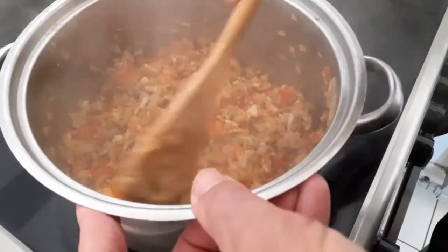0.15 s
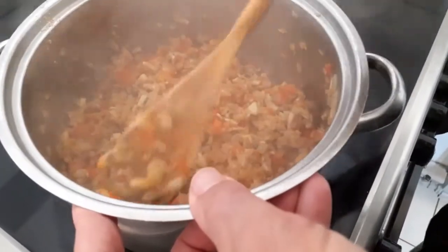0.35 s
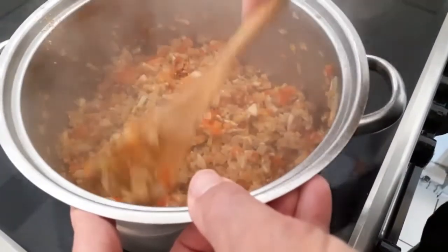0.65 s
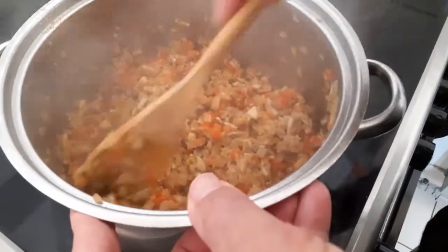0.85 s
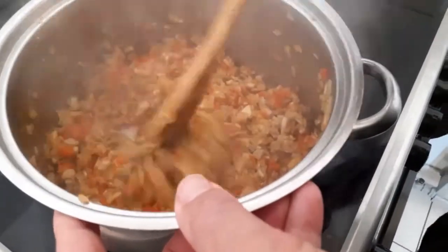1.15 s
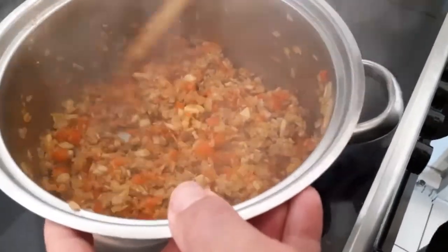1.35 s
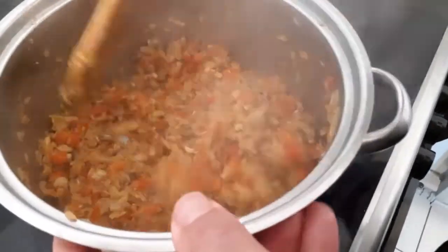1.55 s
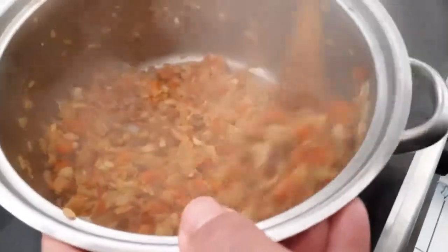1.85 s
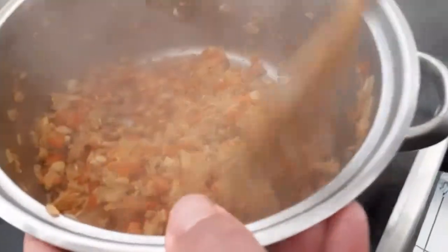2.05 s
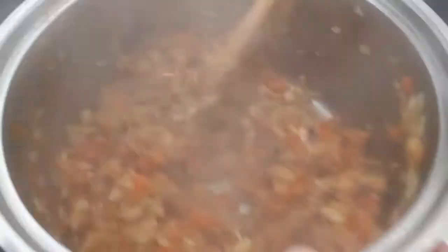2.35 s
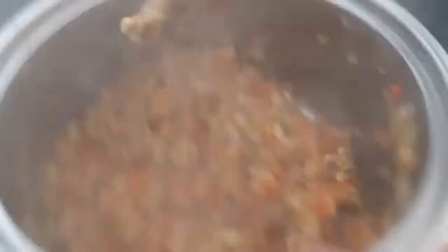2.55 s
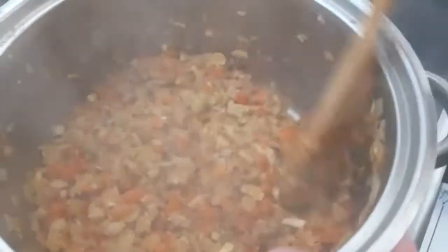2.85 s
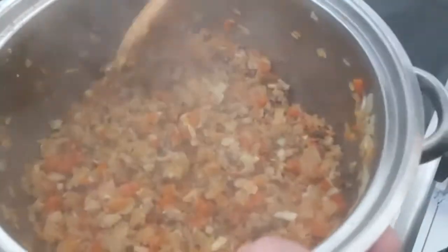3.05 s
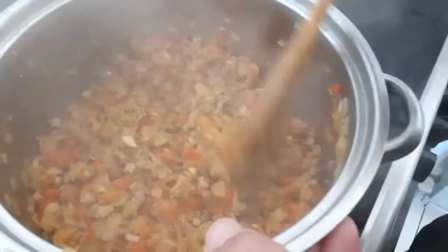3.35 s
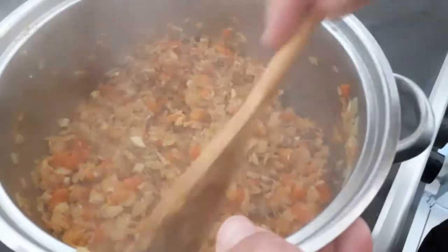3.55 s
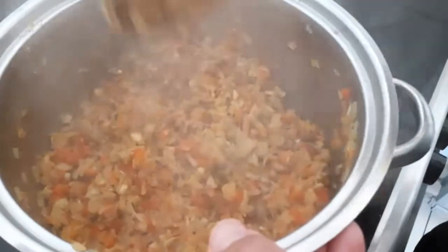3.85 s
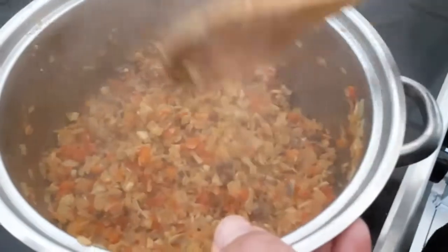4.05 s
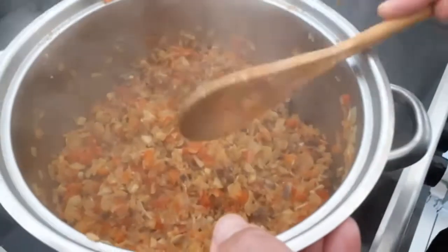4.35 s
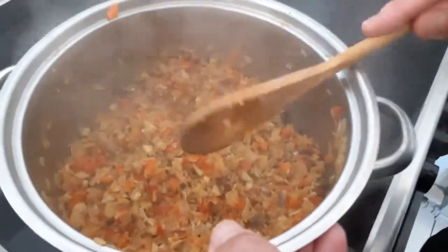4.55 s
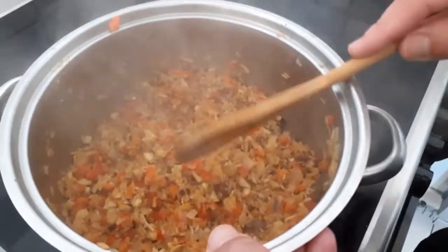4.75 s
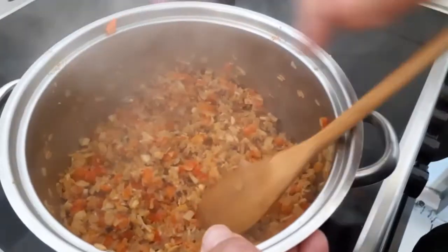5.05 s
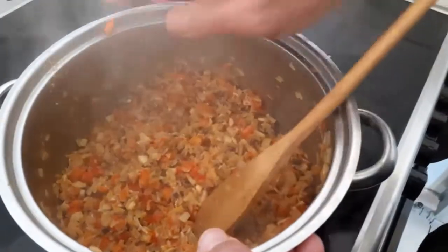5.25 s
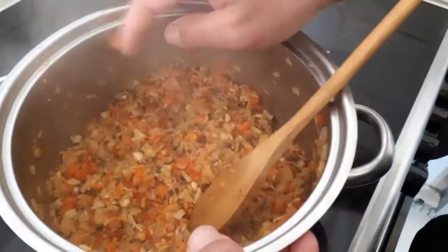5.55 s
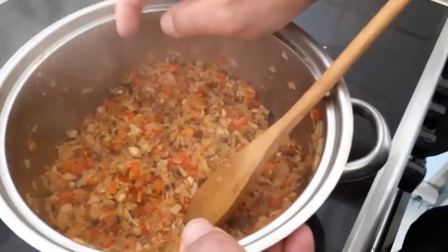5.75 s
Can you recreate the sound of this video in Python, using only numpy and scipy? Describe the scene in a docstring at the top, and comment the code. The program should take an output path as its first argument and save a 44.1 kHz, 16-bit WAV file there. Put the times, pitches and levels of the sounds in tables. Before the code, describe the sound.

Heard close up in a small kitchen, a wooden spoon works through wet frying food in a metal pot, with uneven dull knocks, rasping scrapes and short crackling spits. The sizzle swells as the food is turned, then settles when the stirring stops. Five quick, even taps of wood on the steel rim follow, and a few faint knocks end it. A low hum like a fan runs underneath.

```python
"""Frying food sizzles over a low hum; a wooden spoon knocks and scrapes in a steel pot on a hob.
Small kitchen, a phone's two microphone ports close to the pot. Wet food spits on the hot metal,
then the spoon is tapped clean five times on the rim.
Blows are sums of damped modes and short noise bursts; scraping, spitting and sizzling are trains of
tiny random clicks shaped by filters and envelopes; the hum is filtered noise."""
import sys
import numpy as np
from scipy import signal
from scipy.fft import rfft, irfft
from scipy.io import wavfile

SR = 44100
rng = np.random.default_rng(int(sys.argv[2]) if len(sys.argv) > 2 else 0)


def transcribe(signal):
    """Save signal, clipped to [-1, 1], as a 16-bit WAV file at the path in sys.argv[1]."""
    frames = np.atleast_2d(signal).T
    limited = np.clip(frames, -1, 1)
    pcm = np.round(limited * 32767).astype(np.int16)
    wavfile.write(sys.argv[1], SR, pcm)


N = 259308
TIME = np.arange(N) / SR
AFTER = TIME[:SR]  # the first second after a blow (s)

HEAVY_DB = -22  # thud level from which a blow shakes the hob fully


def amp(db):
    """Decibels to gain."""
    return 10 ** (np.asarray(db) / 20)


def at_hz(points, hz):
    """Read (Hz, value) points on a log-frequency axis."""
    f, value = np.transpose(points)
    return np.interp(np.log(hz + 1), np.log(f), value)


def colour(x, points):
    """Causal minimum-phase filter with the given spectrum; white noise keeps its power."""
    size = 4096
    gain = amp(at_hz(points, np.fft.rfftfreq(size, 1 / SR)))
    # folding the cepstrum onto positive times makes the response start at once
    cepstrum = irfft(np.log(gain))
    cepstrum[1:size // 2] *= 2
    cepstrum[size // 2 + 1:] = 0
    response = irfft(np.exp(rfft(cepstrum)))
    return signal.fftconvolve(x, response[None] / np.linalg.norm(response))[:, :x.shape[1]]


def soften(x, hz, order):
    """Low-pass: a soft contact cannot drive the high modes."""
    return signal.sosfilt(signal.butter(order, min(hz, SR / 3), fs=SR, output="sos"), x)


def spread(x, split_hz):
    """Two unrelated signals as heard by two ports: alike below split_hz, unrelated above."""
    side = signal.sosfilt(signal.butter(1, split_hz, "high", fs=SR, output="sos"), x[1])
    return np.array([x[0] + side, x[0] - side]) / np.sqrt(2)


def pan(x, left_db):
    """Make the left port louder than the right."""
    return x * amp(np.array([[1], [-1]]) * left_db / 2)


def unit(x):
    """Scale a blow to rms 1 over its first 25 ms."""
    return x / np.sqrt(np.mean(x[..., :SR // 40] ** 2))


def fade(t60):
    """Decay by 60 dB in t60 seconds."""
    return np.exp(-np.log(1000) * AFTER / t60)


def ring(modes, port_hz):
    """Damped modes of a randomly placed blow; those near port_hz and above reach the ports out of step."""
    scatter_db = 1.5  # how much the strength of a mode differs from spot to spot
    out = np.zeros((2, SR))
    for hz, db, t60 in modes:
        size, detune, place = rng.standard_normal(3)
        t = AFTER[AFTER < t60]
        phase = 2 * np.pi * hz * (1 + 0.0053 * detune) * t
        offset = np.array([[-1], [1]]) * (1 + 0.52 * place) * min(hz / port_hz, 1)
        gain = rng.choice([-1, 1]) * amp(db + scatter_db * size)
        decay = np.exp(-np.log(1000) * t / t60)
        out[:, :len(t)] += gain * decay * np.sin(phase + offset)
    return unit(out)


def burst(points, t60, split_hz):
    """Many crowded, short-lived modes, heard as fading coloured noise."""
    noise = spread(rng.standard_normal((2, SR)), split_hz)
    return colour(noise * fade(t60), points)


def grains(rate, scatter_db):
    """Two trains of tiny random clicks of uneven size, rate clicks per second on average, rms 1."""
    present = rng.random((2, N)) < rate / SR
    sign = rng.choice([-1, 1], (2, N))
    size = amp(scatter_db * np.minimum(rng.exponential(size=(2, N)), 5))
    x = present * sign * size
    return x / x.std()


def walk(rate):
    """Random wandering: straight lines between rate normal draws per second."""
    return np.interp(TIME * rate, np.arange(N), rng.standard_normal(N))


def add(out, s, x):
    """Mix a sound in at time s."""
    i = max(int(s * SR), 0)
    out[:, i:i + x.shape[1]] += x[:, :N - i]


def hum():
    """Low steady rush of the kitchen, like an extractor fan: noise weighted to the bass."""
    # spectrum of the rush: hz, density_db (dB per Hz, relative)
    hum_spectrum = [(20, -51), (45, -15), (72, 3.5), (102, 7), (135, -8), (220, -12), (310, -7.5),
                    (430, -19.5), (800, -25), (1300, -41.5), (4000, -52.5)]
    noise = spread(rng.standard_normal((2, N)), split_hz=770)
    return pan(colour(noise, hum_spectrum), left_db=6.0) * amp(-52.5)


def kitchen(x, wet_db):
    """Dense reflections from near walls; the bass lingers longest and the top treble dies first."""
    # tone of the reflections: hz, level_db (relative)
    room_colour = [(60, -15.5), (160, -5), (350, -0.5), (700, 1), (1200, -3), (2000, -5), (4000, -0.5),
                   (7000, -9), (12000, -2)]
    # decay of the reflections: hz, t60_s
    room_t60 = [(100, 1), (500, 0.28), (3000, 0.35), (7000, 0.41), (14000, 0.18)]
    noise = rfft(spread(rng.standard_normal((2, SR)), split_hz=800))
    octave = np.log2(np.clip(np.fft.rfftfreq(SR, 1 / SR), 2 ** 6, 2 ** 14))
    tail = np.zeros((2, SR))
    for k in range(6, 15):  # overlapping octave bands, each with its own decay
        band = irfft(noise * np.maximum(1 - abs(octave - k), 0), SR)
        tail += band * fade(at_hz(room_t60, 2. ** k))
    onset = 1 - np.exp(-(AFTER / 0.0013) ** 2)
    tail = colour(tail * onset, room_colour)
    tail /= np.sqrt(np.sum(tail ** 2) / 2)
    heard = 0.7 * x + 0.24 * x[::-1]  # each side also feeds the other
    return amp(wet_db) * signal.fftconvolve(heard, tail, axes=1)[:, :N]


def heat():
    """Level of the sizzle (dB): it flares each time fresh food is turned onto the bottom, then settles."""
    # underlying sizzle, which drops when the stirring stops: time_s, level_db
    simmer = [(0, -52), (2.8, -51.5), (3.2, -55.5), (5.88, -57)]
    # fresh food turned onto the hot bottom: peak_s, rise_db
    turns = [(1.08, 3), (1.79, 5), (2.47, 10)]
    swell_s, settle_s = 0.21, 0.15  # time constants before and after a turn
    time_s, level_db = np.transpose(simmer)
    sizzle_db = np.interp(TIME, time_s, level_db)
    for s, rise_db in turns:
        away = np.maximum((s - TIME) / swell_s, (TIME - s) / settle_s)
        sizzle_db = sizzle_db + rise_db * np.exp(-away)
    return sizzle_db


def frying():
    """Countless tiny bubbles burst; the turned food rustles wetly, coloured by the hollow of the pot."""
    # spectra of bubbles and wet food: hz, density_db (dB per Hz, relative)
    sizzle_spectrum = [(500, -34), (1500, -13.5), (2800, -4), (4500, -0.5), (7000, 1), (8400, -0.5),
                       (9600, -15.5), (12500, -8), (16000, -10)]
    rustle_spectrum = [(300, 4), (850, -22.5), (1050, -2.5), (1230, 1.5), (1450, 0.5), (2600, 0.5),
                       (4000, -4), (8000, -13), (16000, -23)]
    rustle_db = 0.5  # relative to the sizzle
    sizzle_db = heat()
    bubbles = spread(grains(rate=17000, scatter_db=3.0), split_hz=1600)
    sizzle = colour(bubbles, sizzle_spectrum) * amp(sizzle_db + 0.9 * walk(28))
    food = spread(grains(rate=5000, scatter_db=-1.5), split_hz=960)
    rustle = colour(food, rustle_spectrum) * amp(sizzle_db + rustle_db + 2 * walk(27.36))
    return pan(sizzle, left_db=1.5) + pan(rustle, left_db=6.0)


def gate(length):
    """Envelope of a burst of steam: attack, hold, release."""
    attack_s, release_s = 0.00065, 0.00093  # time constants
    attack = 1 - np.exp(-AFTER[None] / attack_s)
    return attack * np.exp(-np.maximum(AFTER - length, 0) / release_s)


def spits():
    """Moisture flashes to steam in short crackling bursts; the wettest ones sputter on unevenly."""
    # wet food meets hot metal: start_s, flash_s, level_db, sputter_s (0 = none)
    spit_events = [(0.118, 0.0039, -38.5, 0.0038), (0.615, 0.0039, -38.5, 0), (0.858, 0.0046, -40, 0),
                   (1.049, 0.018, -35.5, 0.0049), (1.273, 0.0062, -37.5, 0.0017),
                   (1.306, 0.014, -30.5, 0.0048), (1.593, 0.03, -38.5, 0.011),
                   (1.619, 0.0058, -25.5, 0.023), (2.076, .016, -40, 0), (2.31, 0.027, -26.5, .033),
                   (2.936, 0.046, -31.5, 0.038), (3.033, 0.0098, -40, 0), (3.2607, .013, -30, 0.0083),
                   (4.004, 0.0068, -31, .04)]
    # spectrum of the crackle: hz, density_db (dB per Hz, relative)
    spit_spectrum = [(1000, -21.5), (4000, -18), (5100, -0.5), (6800, 4.5), (8000, 2.5), (9100, -8.5),
                     (10200, -13), (12500, -11.5), (16000, -12)]
    sputter_db = -8.5  # relative to the flash
    flash, sputter = np.zeros((2, 1, N))
    for s, length, db, sputter_s in spit_events:
        add(flash, s, amp(db) * gate(length))
        if sputter_s > 0:
            add(sputter, s + length, amp(db + sputter_db) * gate(sputter_s))
    steam = flash + sputter * amp(3 * walk(120))
    crackle = spread(grains(rate=7800, scatter_db=1), split_hz=3000) * amp(2.6 * walk(450))
    return pan(colour(crackle * steam, spit_spectrum), left_db=4.0)


def pressure():
    """How hard the spoon rubs (dB): each stroke swells to its hardest push and eases off."""
    # strokes of the spoon over the bottom: hardest_push_s, length_s, level_db
    strokes = [(0.87, 1.2, -45.5), (1.772, 0.7, -50), (2.417, 0.72, -39), (2.461, .02, -31),
               (2.579, 0.22, -14), (2.925, .25, -38.5)]
    swell_share = 0.44  # part of a stroke before its hardest push
    stroke_range_db = 21  # how far the ends of a stroke lie under its peak
    rub_db = -65.5  # faint rubbing of the pot held on the hob
    drag_db = np.full(N, rub_db)
    for s, length, db in strokes:
        away = np.maximum((s - TIME) / swell_share, (TIME - s) / (1 - swell_share)) / length
        drag_db = np.maximum(drag_db, db - stroke_range_db * away)
    return drag_db


def scrape():
    """The spoon sticks and slips over the bottom; each slip rasps and sets the pot juddering on the hob."""
    # pot bottom juddering on the hob: mode_hz, level_db (relative), t60_s
    bottom_modes = [(143, -17, 0.21), (184, -30, 0.096), (260.9, 2, 0.39), (298, 4.5, 0.11),
                    (345.6, 4.5, 0.2), (554, -12, 0.14), (686, -4, .22), (778, 0, 0.095), (834, -17, 0.15)]
    # spectrum of the rasp: hz, density_db (dB per Hz, relative)
    scrape_spectrum = [(30, -39), (80, 1.5), (170, -2), (320, -1.5), (480, -1.5), (800, -8.5),
                       (1300, -15.5), (1900, -15.5), (2500, -13.5), (3100, -25), (4000, -21.5), (7500, -30),
                       (10000, -54), (16000, -65)]
    slips = spread(grains(rate=1100, scatter_db=2.5), split_hz=850)
    slips = slips * amp(pressure() + 2 * walk(110))
    bottom = ring(bottom_modes, port_hz=4000)
    judder = signal.fftconvolve(slips, bottom / np.linalg.norm(bottom[0]), axes=1)[:, :N]
    rasp = colour(slips, scrape_spectrum)
    return pan(amp(-2) * rasp + amp(-2.0) * judder, left_db=5.0)


def thud(db, rise_s):
    """The heavy pot takes a moment to get moving; it bounces, rattles and makes the hob boom."""
    # pot bouncing on the hob, and the hob itself: mode_hz, level_db (relative), t60_s
    thud_modes = [(160.85, 3, 0.35), (183.4, -10, 0.066), (190.2, -11, 0.44), (236.7, -16, 1),
                  (257, -19, 0.41), (312.7, -8.5, 0.39), (351, -4, 0.2), (379.5, -7, 0.16),
                  (453, -18, 0.14)]
    hob_modes = [(64, -11, 0.7), (83.4, -2.5, 0.81), (107.4, 0, 0.85), (115.3, -8.5, 0.22)]
    # spectrum of the rattle: hz, density_db (dB per Hz, relative)
    rattle_spectrum = [(30, -9), (70, -12), (130, 0.5), (220, 3.5), (350, -2), (480, -6), (900, -18.5),
                       (2000, -22.5), (6000, -65)]
    bounce = ring(thud_modes, port_hz=4940)
    rattle = unit(burst(rattle_spectrum, t60=0.4, split_hz=1000))
    # blows under HEAVY_DB boom relatively less, by at most 7 dB
    boom = ring(hob_modes, port_hz=4940) * amp(np.clip(2 * (db - HEAVY_DB), -7, 0))
    body = amp(-2.0) * bounce + amp(-4) * rattle + amp(-10.0) * boom
    return amp(db) * pan(body * (1 - np.exp(-AFTER / rise_s)), left_db=5.0)


def knocks():
    """The spoon hits the pot through food: a thud, a clack that grows with force, a short note of the pot."""
    # spoon against wall and bottom: start_s, strength_db, contact_brightness_hz, ring_freedom (0-1)
    knock_events = [(0.1204, -32, 2980, 1), (0.346, -34.5, 1130, 0.2), (0.6179, -34, 3900, .28),
                    (.836, -27, 1920, 0.04), (1.315, -39, 2060, .03), (1.6044, -31.5, 3600, 0.13),
                    (1.719, -39, 900, .05), (1.799, -39, 910, .05), (2.084, -42, 694, 0.02),
                    (2.309, -34, 740, 0), (2.463, -26.5, 640, 0.13), (2.5823, -22, 4760, 0.4),
                    (2.8153, -27, 1920, 0.66), (5.028, -51.5, 800, 0.18), (5.542, -42, 750, 0.07),
                    (5.734, -48, 710, .05)]
    # spectrum of the clack: hz, density_db (dB per Hz, relative)
    clack_spectrum = [(50, -8.5), (150, -10.5), (400, 8), (650, -8), (950, -1.5), (1500, -11), (1950, -16),
                      (2700, -2.5), (3400, -8.5), (4400, -16.5), (7500, -7), (10000, -19), (16000, -25)]
    # whole pot, struck from inside: mode_hz, level_db (relative), t60_s
    pot_modes = [(939, -10.5, 0.22), (1220, 1.5, 0.088), (1500, -28, 0.11), (2270, -17, .2),
                 (2734, -3, 0.061), (3420, -3, 0.044)]
    heavy_clack_db = 4  # clack of a blow at HEAVY_DB, relative to its strength
    clack_slope = 0.6  # dB of clack lost for each dB that the blow is weaker
    out = np.zeros((2, N))
    for s, db, bright_hz, free in knock_events:
        clack = burst(clack_spectrum, t60=0.082, split_hz=590)
        clack = pan(unit(soften(clack, bright_hz, order=3)), left_db=2.5)
        note = ring(pot_modes, port_hz=1930)
        note = pan(unit(soften(note, bright_hz, order=3)), left_db=11.0)
        clack_db = heavy_clack_db + clack_slope * (db - HEAVY_DB)
        add(out, s, thud(db, rise_s=0.0008) + amp(db) * (amp(clack_db) * clack + free * note))
    return out


def clanks():
    """Bare wood catches the steel wall, whose modes are damped by the food."""
    # contacts with the wall: start_s, level_db
    clank_events = [(0.8366, -37), (1.6057, -37), (2.462, -35.5), (2.8168, -18)]
    # steel wall: mode_hz, level_db (relative), t60_s
    wall_modes = [(982, -5, 0.13), (1100, 4.5, 0.016), (1204, -14, 0.018), (1583, -0.5, 0.095),
                  (1721, 9, 0.034), (1887, 7, 0.037), (2290, 6, 0.067), (2590, -3, 0.066),
                  (3620, -5, 0.034)]
    out = np.zeros((2, N))
    for s, db in clank_events:
        wall = ring(wall_modes, port_hz=2020) * (1 - np.exp(-AFTER / 0.00086))
        add(out, s, amp(db) * pan(wall, left_db=5.5))
    return out


def taps():
    """Wood on one spot of the bare rim: a click, the pot's hollow note, a steel ring with crowded modes, a thud."""
    # handle tapped on the rim: start_s, strength_db, click_db (relative to the strength)
    tap_events = [(3.9633, -14, -11.5), (4.1669, -15.5, -6), (4.3595, -15.5, -6.5), (4.5474, -15, -10.5),
                  (4.7347, -17.5, -10.5)]
    # air in the hollow of the pot, and the steel rim: mode_hz, level_db (relative), t60_s
    air_modes = [(1213.6, -0.5, 0.043), (1153, -1, 0.035), (1585, -8.5, 0.06), (1840, -10, 0.033),
                 (2486, -18, 0.044), (2802, -16, 0.068), (3746, -9.5, 0.016)]
    rim_modes = [(1162, -5, 0.14), (1260, 8, 0.093), (1420, -14, 0.17), (1575, 2, 0.21), (1900, -19, 0.19),
                 (2260, -20.5, 0.21), (2470, -3.5, 0.15), (2810, 0, 0.43), (2950, -14, 0.25),
                 (4000, -15, 0.26), (6200, -23, 0.86)]
    # spectrum of the click and the crowded modes: hz, density_db (dB per Hz, relative)
    click_spectrum = [(300, -12.5), (750, 4.5), (1100, 5.5), (1600, 6.5), (3000, 1.5), (5000, -6.5),
                      (7800, -10), (9700, -25), (12000, -24.5), (16000, -33)]
    rim_db, thud_db = -14, -7  # relative to the hollow note
    out = np.zeros((2, N))
    # drawn once: every tap lands on the same spot
    air = pan(ring(air_modes, port_hz=1310) * (1 - np.exp(-AFTER / 0.0027)), left_db=6.5)
    rim = ring(rim_modes, port_hz=2040)
    for s, db, click_db in tap_events:
        crowd = unit(burst(click_spectrum, t60=0.44, split_hz=480))
        steel = pan(amp(-3) * rim + amp(-2.0) * crowd, left_db=3.5)
        click = pan(unit(burst(click_spectrum, t60=0.029, split_hz=410)), left_db=6.0)
        strike = amp(db) * (air + amp(rim_db) * steel + amp(click_db) * click)
        add(out, s, strike + thud(db + thud_db, rise_s=0.0023))
    return out


def scene():
    """Spoon, pot and frying food in the kitchen; the reflections carry the spoon and the spits."""
    spoon = knocks() + clanks() + taps() + scrape()
    steam = spits()
    reflections = kitchen(spoon + amp(1.5) * steam, wet_db=-7)
    return spoon + steam + reflections + frying() + hum()


def record(dry):
    """The phone colours its two ports, drops the deepest bass, rounds the loudest peaks and cuts the top."""
    # balance of the two microphone ports: hz, left_minus_right_db
    port_balance = [(150, -2), (380, -2), (700, -2.5), (1300, 4), (4400, -1.5), (8200, 3), (9500, -3),
                    (11500, -8), (16000, -2.5)]
    top_hz = 15800
    balance_db = at_hz(port_balance, np.fft.rfftfreq(N, 1 / SR))
    ports = irfft(pan(rfft(dry), balance_db), N)
    lean = signal.sosfilt(signal.butter(3, 52, "high", fs=SR, output="sos"), ports)
    rounded = 1.15 * np.tanh(lean / 1.15)
    return signal.sosfilt(signal.ellip(10, .2, 80, top_hz, fs=SR, output="sos"), rounded)


dry = scene()
out = record(dry)
transcribe(out)
```